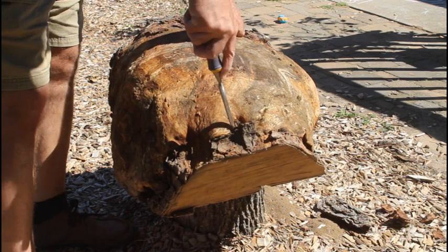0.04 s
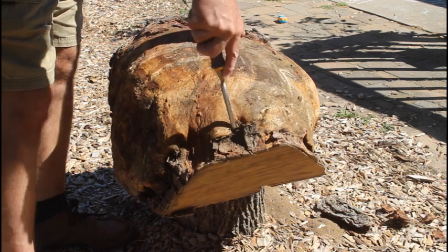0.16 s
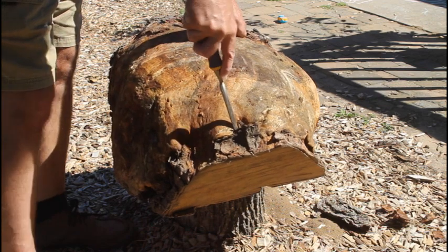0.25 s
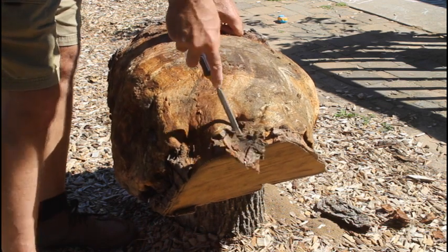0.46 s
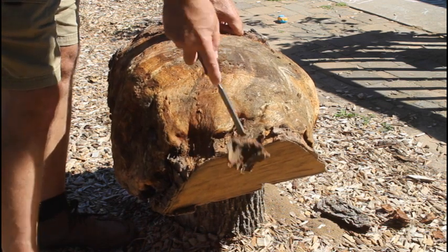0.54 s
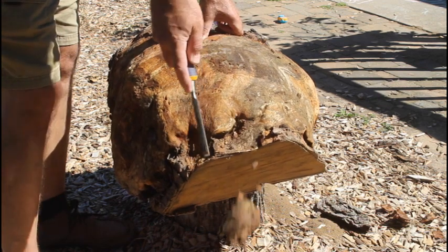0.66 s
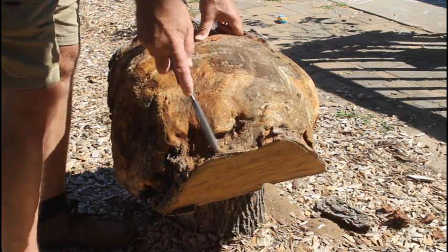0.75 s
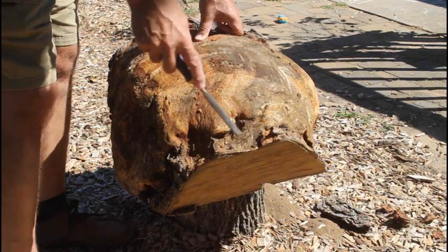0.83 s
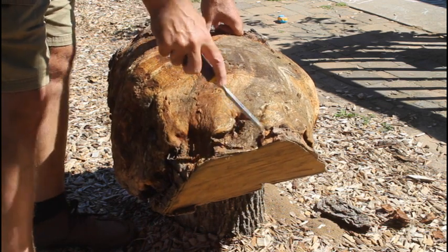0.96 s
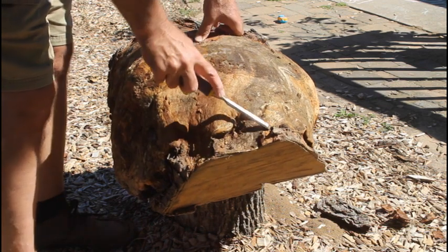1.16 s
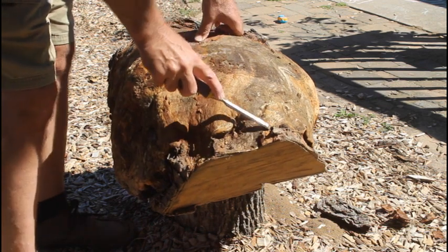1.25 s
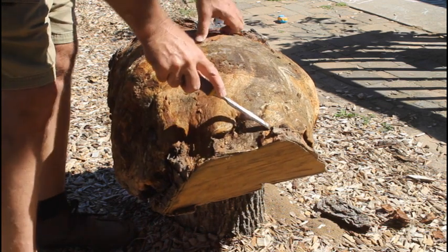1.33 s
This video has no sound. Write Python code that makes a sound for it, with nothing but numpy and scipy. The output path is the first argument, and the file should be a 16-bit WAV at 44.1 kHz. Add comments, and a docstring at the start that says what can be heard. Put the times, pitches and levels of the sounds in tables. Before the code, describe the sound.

A chisel tears bark from a log in two sharp, close crunches, the steel ringing faintly. The loose piece thumps and crumbs tick. Each crunch is followed by one short, far bird whistle above a low outdoor rumble.

```python
"""Over a low outdoor hum comes a sharp crunch: a steel chisel prising bark off a dry log in a yard.
The bark tears twice, each time in a run of snaps over the crackle of fibres, and the steel rings faintly.
In the second crunch the loosened piece thumps on the log, and crumbs tick after it.
A distant bird whistles once after each crunch."""
import sys
import numpy as np
from scipy import signal
from scipy.fft import rfft, irfft
from scipy.io import wavfile

SR = 44100
rng = np.random.default_rng(int(sys.argv[2]) if len(sys.argv) > 2 else 0)


def put_to_file(sound):
    """Save the sound as 16-bit audio at rate SR, in the file named by the first command-line argument."""
    columns = np.atleast_2d(sound).T  # one column per channel
    safe = np.clip(columns, -1, 1)
    whole_steps = np.round(safe * 32767)
    wavfile.write(sys.argv[1], SR, whole_steps.astype(np.int16))


N = 61739
TIME = np.arange(N) / SR
FREQUENCIES = np.arange(N // 2 + 1) * SR / N


def from_db(db):
    """Turn decibels into a number to multiply by."""
    return 10 ** (np.asarray(db) / 20)


def unit_level(sound):
    """Scale a sound so that its average power is 1."""
    return sound / np.sqrt(np.mean(sound ** 2) + 1e-20)


def add(out, start_s, sound):
    """Mix a sound in at the given time."""
    i = int(start_s * SR)
    out[i:i + len(sound)] += sound[:len(out) - i]


def coloured(sound, colour):
    """Set the balance of lows and highs, then scale to power 1."""
    hz, db = np.transpose(colour)
    curve_db = np.interp(np.log(np.maximum(FREQUENCIES, 1)), np.log(hz), db)
    return unit_level(irfft(rfft(sound) * from_db(curve_db), N))


def drift(rate_hz):
    """A random wobble, mostly slower than the given rate."""
    return unit_level(irfft(rfft(rng.standard_normal(N)) / (1 + (FREQUENCIES / rate_hz) ** 2), N))


def echo_wash(sound, fade_s):
    """Blurred echoes from ground, fence and trees. Here and below, fade_s is the time to fall 60 dB."""
    build_up = 1 - np.exp(-TIME / 0.011)
    tail = rng.standard_normal(N) * from_db(-60 * TIME / fade_s) * build_up
    return signal.fftconvolve(sound, tail / np.sqrt(np.sum(tail ** 2)))[:N]


def ring(pushes, tones):
    """Each push on an object sets off its own fading tones."""
    one_tap = sum(from_db(db - 60 * TIME / fade_s) * np.cos(2 * np.pi * hz * TIME)
                  for hz, db, fade_s in tones)
    return signal.fftconvolve(pushes, one_tap)[:N]


# Lows and highs of the far rumble: frequency_hz, relative_db
RUMBLE_COLOUR = [(15, -8), (25, 0.5), (70, -5.5), (178, -11.5), (246, -12), (297, -16.5), (368, -13.5),
                 (495, -16.5), (826, -10.5), (1200, -11), (2230, -26.5), (2770, -23), (4040, -29.5),
                 (5280, -33), (7100, -39), (15500, -42.5)]
# Tones of the hum: pitch_hz, level_db
HUM_TONES = [(117, -53.5), (232, -58.5), (350, -53)]
def surroundings():
    """Far rumble and rush, with a faint wavering hum."""
    hum, waver_hz = np.zeros(N), 2.32
    for hz, db in HUM_TONES:
        pitch = hz + waver_hz * drift(rate_hz=5.8)
        hum += from_db(db) * np.sqrt(2) * np.sin(2 * np.pi * np.cumsum(pitch) / SR)
    return hum + from_db(-37.5) * coloured(rng.standard_normal(N), RUMBLE_COLOUR)


# The bird's calls: start_s, level_db, wash_relative_db
BIRD_CALLS = [(0.559, -33.5, -7), (1.076, -35.5, -1.5)]
# The rise and fall of one call: time_s, pitch_hz, relative_db
CALL_SHAPE = [(0, 2993, -1.5), (.009, 3745, -5.5), (.019, 4250, -5.5), (0.037, 3900, 0), (.046, 3735, 2),
              (.051, 3183, -3), (.056, 3650, 4.5), (.068, 3400, -6.5), (.079, 2920, -1)]
# Separate echoes of each call: delay_s, relative_db
CALL_ECHOES = [(.019, -9), (.036, -27)]
def bird():
    """A slightly rough whistle rises and falls, smeared by echoes on its way."""
    times, hz, db = np.transpose(CALL_SHAPE)
    out, t = np.zeros(N), TIME[TIME < times[-1]]
    roughness = .036
    for start_s, call_db, wash_db in BIRD_CALLS:
        pitch = np.interp(t, times, hz) * (1 + roughness * drift(rate_hz=416)[:len(t)])
        level = from_db(call_db + np.interp(t, times, db)) * signal.windows.tukey(len(t), .1)
        call = level * np.sin(2 * np.pi * np.cumsum(pitch) / SR)
        add(out, start_s, call)
        add(out, start_s, from_db(wash_db) * echo_wash(call, fade_s=0.49))
        for delay_s, echo_db in CALL_ECHOES:
            add(out, start_s + delay_s, from_db(echo_db) * call)
    return out


# Small shifts of the log: start_s, level_db, pitch_hz
LOG_SHIFTS = [(.36, -33, 75), (0.509, -37.5, 98.5), (1.071, -41.5, 110)]
def log_bumps(length_s=0.068):
    """A soft, low bump each time the log shifts on its stump."""
    out, t = np.zeros(N), TIME[TIME < length_s]
    for start_s, db, hz in LOG_SHIFTS:
        add(out, start_s, from_db(db) * np.hanning(len(t)) * np.sin(2 * np.pi * hz * t))
    return out


# Knocks of loose bark: start_s, strength_db, contact_s
BARK_KNOCKS = [(.3430, -22.5, 0.00089), (0.3679, -28.5, 0.0013), (.8307, -13.5, 0.0013),
               (.8510, -13.5, 0.0025)]
# The log's own tones: pitch_hz, relative_db, fade_s
LOG_TONES = [(145, -9.5, 0.038), (193, -4, 0.04), (246, -9.5, 0.019), (355, -12.5, 0.019),
             (448, -13, 0.031)]
def log_thumps(low_cut_hz=132):
    """Loose bark knocks on the log, which rings low and briefly; a longer contact sounds duller."""
    pushes = np.zeros(N)
    for start_s, db, contact_s in BARK_KNOCKS:
        push = np.sin(np.pi * TIME[TIME < contact_s] / contact_s)
        add(pushes, start_s, from_db(db) * push / push.sum())
    low_cut = signal.butter(3, low_cut_hz, "high", fs=SR, output="sos")
    return signal.sosfilt(low_cut, ring(pushes, LOG_TONES))


# Tones of the steel shaft: pitch_hz, relative_db, fade_s
CHISEL_TONES = [(2160, -58, 0.087), (2410, -59, 0.056), (2894, -38, 0.025), (4650, -57, 0.028),
                (5450, -49, 0.026)]
def chisel_ring(breaks):
    """Breaking bark makes the steel ring; the hand holding it soon stops the sound."""
    return ring(breaks, CHISEL_TONES)


# How loud the tearing is as it goes on: time_s, level_db
TEARING_LEVEL = [(0, -57.5), (.17, -51), (.21, -43.5), (.24, -46.5), (.258, -40), (.283, -37.5),
                 (.31, -36.5), (.333, -18.5), (.348, -22), (.372, -47), (.42, -48.5), (.52, -61),
                 (.54, -50), (.57, -57), (.81, -96), (.835, -26), (.862, -38.5), (.91, -46.5), (.97, -46),
                 (1.05, -48), (1.34, -60), (1.375, -45.5), (1.4, -60)]
# Lows and highs of the crackle: frequency_hz, relative_db
CRACKLE_COLOUR = [(200, -22), (600, -19), (1300, -4.5), (2200, 1), (3600, -1), (5000, 0), (8000, -8),
                  (11500, -7), (15500, -16)]
def fibre_crackle(breaks_per_s=3400, spread_db=3.5):
    """Fibres give way in many tiny breaks of uneven size as the blade pushes on."""
    sizes = from_db(spread_db * np.minimum(rng.exponential(1, N), 4))
    signs = rng.choice([-1, 1], N)
    breaks = sizes * signs * (rng.random(N) < breaks_per_s / SR)
    level = from_db(np.interp(TIME, *np.transpose(TEARING_LEVEL)))
    return coloured(breaks, CRACKLE_COLOUR) * level


# Snaps of the bark: start_s, level_db, woody_boost_db, treble_boost_db, splinter_pitch_hz
BARK_SNAPS = [(0.197, -35, 0, -5, 3560), (0.2247, -23.5, -10, -6.5, 5100), (0.2484, -18.5, -5, -2.5, 5150),
              (0.2534, -26, -18, -6, 4650), (0.255, -29, -15, -9, 2700), (0.2564, -21.5, -5, -6, 3380),
              (0.2595, -23, -4, -2, 5570), (0.2608, -31, -14, 8, 9730), (0.2686, -23.5, 2, 0, 5130),
              (0.2703, -23.5, -19, -5, 4930), (0.2778, -35, -6, -13, 5330), (0.297, -30.5, -1, -3, 5360),
              (0.3023, -31, 1, -9, 2180), (0.3154, -19.5, -2, -8, 2206), (0.3185, -26, 5.5, 6, 10900),
              (0.3195, -14, -10, -4, 11300), (0.3256, -30.5, 2.5, 8, 2730), (0.3307, -19, -2.5, 4.5, 4620),
              (0.3337, -19.5, -8, -10, 5400), (0.3366, -38, -13, -8, 4750), (0.3387, -42, -5, 1, 2640),
              (0.343, -18, 1, 2, 2210), (0.3449, -23.5, -10, -8, 2490), (0.3496, -34, -6, -4, 3020),
              (0.3647, -37, 9, -14, 2460), (0.5285, -37, 7, -26, 1630), (0.6888, -37, -4, -2, 3680),
              (0.8049, -32, -17, -5, 5230), (0.8065, -27.5, -9, -3, 4080), (0.8295, -24.5, 5.5, 0.5, 4840),
              (0.8317, -15, -1, -1.5, 4600), (0.8422, -35.5, 11.5, -13, 3100), (0.849, -29, 2, -2, 4440),
              (0.851, -27, -6, -5, 4840), (0.8723, -37, -2, -2, 5370), (0.8759, -29, -0.5, -4, 2640),
              (0.9003, -30.5, -6, -0.5, 11400), (0.937, -27, -2.5, -2.5, 3630), (0.9393, -33, -4, -8, 3450),
              (0.956, -32, -17, -4, 4770), (0.9752, -52.5, 4, 15, 12780), (1.009, -45.5, 9.5, 3.5, 2940),
              (1.088, -40.5, -10, -8.5, 4270)]
# The bands of one snap, low to high: low_hz, high_hz, relative_db, decay_s
SNAP_BANDS = [(252, 415, -24, 0.0022), (1103, 1850, -11, 0.0014), (1770, 3540, 1.5, 0.00049),
              (3900, 5740, 0, 0.00021), (6640, 8690, -2, 0.00012), (9360, 12740, 1.5, 0.00014)]
def bark_snaps():
    """Each snap is a clean click, a tiny burst of crumbling with a faint tail, and a splinter's ping."""
    out, t = np.zeros(N), TIME[:SR // 25]
    click = from_db(9.5) * (t == 0)
    tail = from_db(-15) * np.exp(-t / .003)
    band_energy = .002 * SR  # as much as 2 ms of sound at power 1
    ping_boost_db, ping_cycles = 6.5, 6.05  # the ping falls to about a third in this many cycles
    for start_s, db, woody_db, treble_db, hz in BARK_SNAPS:
        crumble = rng.standard_normal(len(t))
        boosts_db = (woody_db, woody_db, woody_db, 0, treble_db / 2, treble_db)
        for (low_hz, high_hz, band_db, decay_s), boost_db in zip(SNAP_BANDS, boosts_db):
            burst = click + crumble * (np.exp(-t / decay_s) + tail)
            band_pass = signal.butter(2, [low_hz, high_hz], "band", fs=SR, output="sos")
            band = signal.sosfilt(band_pass, burst)
            band *= np.sqrt(band_energy / np.sum(band ** 2))
            add(out, start_s, from_db(db + band_db + boost_db) * band)
        ping = np.exp(-t * hz / ping_cycles) * np.sin(2 * np.pi * hz * t)
        add(out, start_s, from_db(db + ping_boost_db) * ping)
    return out


def scene():
    """Close bark with a short yard echo, far bird and surroundings; left and right are nearly alike."""
    breaks = bark_snaps() + fibre_crackle()
    work = breaks + chisel_ring(breaks) + log_thumps() + log_bumps()
    yard_echo = from_db(-27) * echo_wash(work, fade_s=0.18)
    centre = work + yard_echo + bird() + surroundings()
    width = from_db(-73) * echo_wash(centre, fade_s=0.027) + from_db(-68) * rng.standard_normal(N)
    return np.array([centre + width, centre - width])


def record(dry):
    """Flatten any peak beyond full scale, then cut the highest treble."""
    treble_cut = signal.firwin(255, cutoff=16000, fs=SR)
    return signal.fftconvolve(np.clip(dry, -1, 1), treble_cut[None], mode="same", axes=1)


dry = scene()
out = record(dry)
put_to_file(out)
```